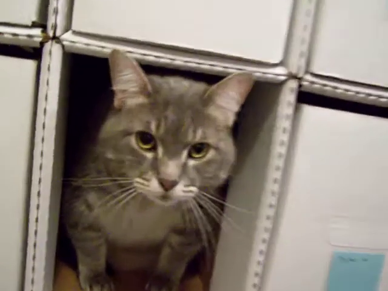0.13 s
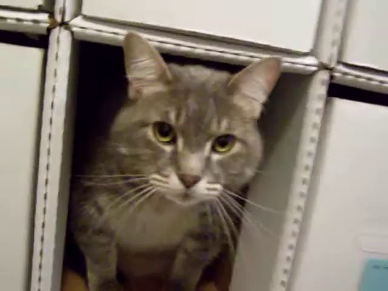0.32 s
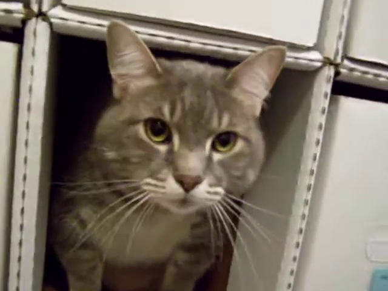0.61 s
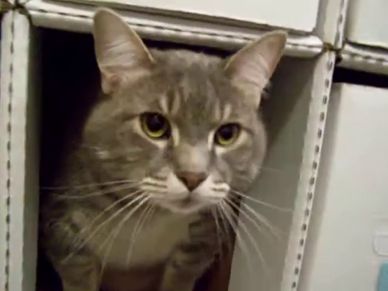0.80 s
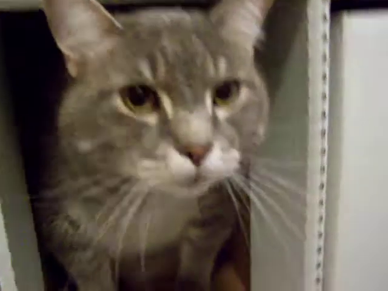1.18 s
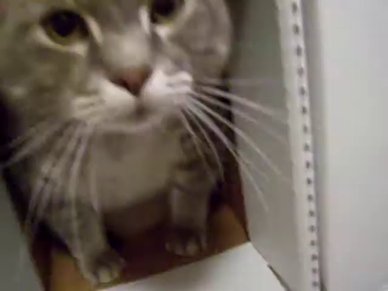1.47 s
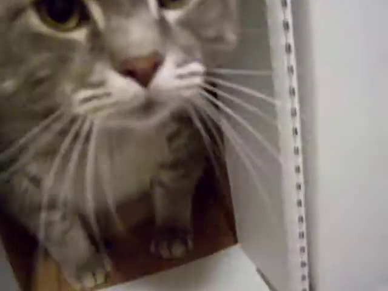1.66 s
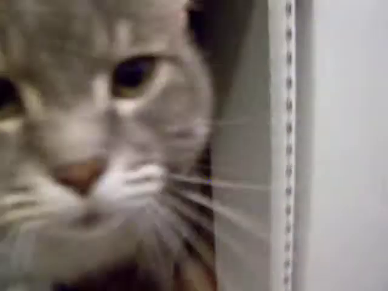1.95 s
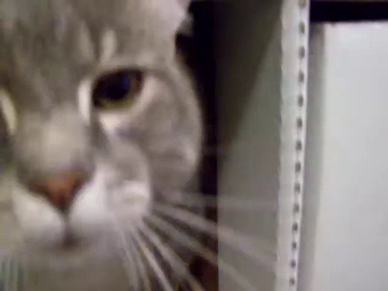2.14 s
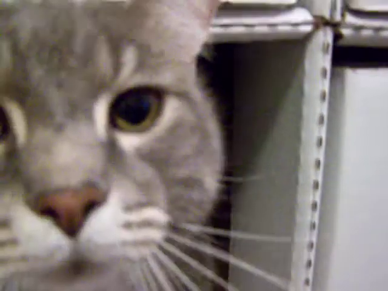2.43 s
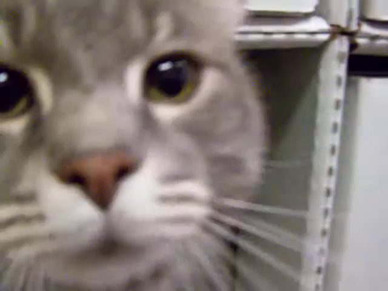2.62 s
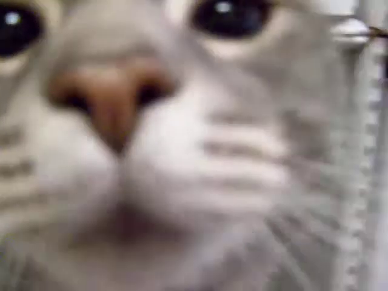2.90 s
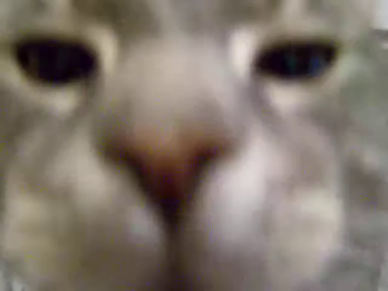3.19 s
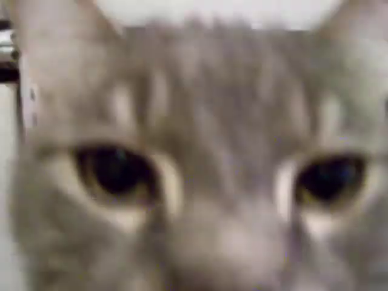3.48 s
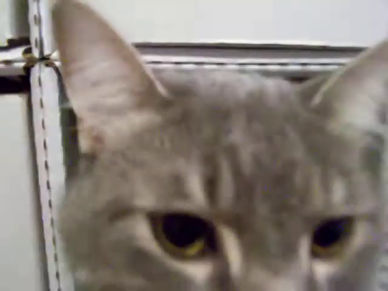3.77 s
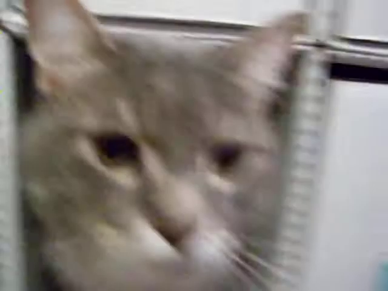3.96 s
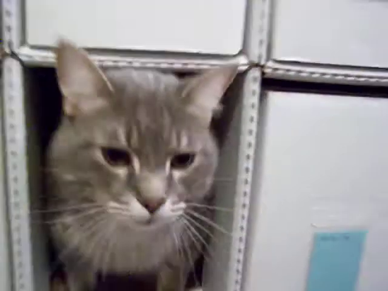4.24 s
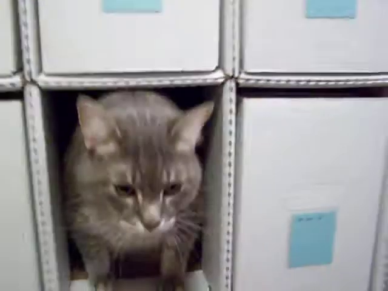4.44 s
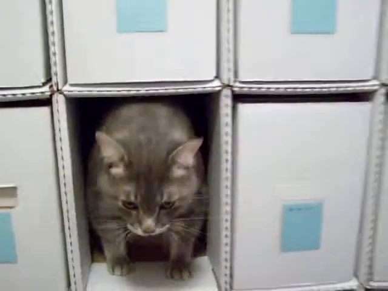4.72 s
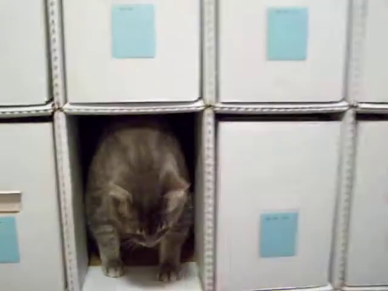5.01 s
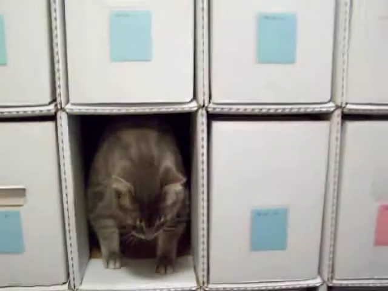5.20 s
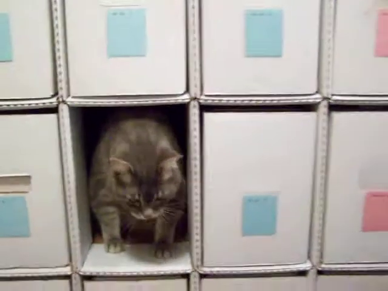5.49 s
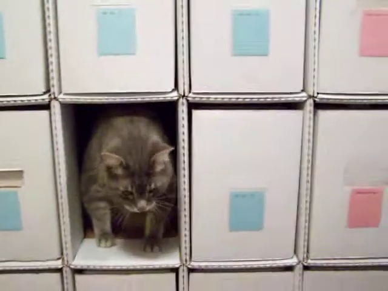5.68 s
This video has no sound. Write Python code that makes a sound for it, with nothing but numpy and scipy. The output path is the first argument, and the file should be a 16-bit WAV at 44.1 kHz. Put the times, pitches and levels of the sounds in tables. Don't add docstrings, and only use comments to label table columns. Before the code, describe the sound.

In a small furnished room, a cat moves in a cardboard compartment. Light scuffs and rustles lead to a rough scrape, then a heavy hollow knock just before two seconds. After a quieter stretch, sharp scraping returns around four seconds, and another heavy knock and a harder short one close the scene. The close hand-held camera adds ticks, dull thumps, hiss and faint hum.

```python
import sys
import numpy as np
from scipy import signal
from scipy.fft import rfft, irfft
from scipy.io import wavfile
from scipy.ndimage import uniform_filter1d

SR = 44100
rng = np.random.default_rng(int(sys.argv[2]) if len(sys.argv) > 2 else 0)


def how_loud(loudness_db):
    steps = np.asarray(loudness_db, float) / 20
    return 10 ** steps


def unload_audio(sound):
    columns = np.transpose(np.atleast_2d(sound))
    steps = np.round(np.clip(columns, -1, 1) * 32767)
    wavfile.write(sys.argv[1], SR, steps.astype(np.int16))


N = 258822
TURN_S = 3.5
# f/Hz, width/Hz, level/dB
BODY_MODES = [
    [(169, 71, -6), (300, 120, -9.5), (457, 170, -2), (607, 41, -1.5), (1027, 68, -3)],
    [(200, 350, -2), (608, 91, 4.5), (778, 23, 1.5), (1068, 260, -4)],
]


def unit(x):
    return x / np.sqrt(np.mean(x ** 2))


def peak(x):
    return x / np.abs(x).max()


def colour(x, points):
    hz, db = np.transpose(points)
    f = np.maximum(np.fft.rfftfreq(len(x), 1 / SR), 1)
    gain_db = np.interp(np.log(f), np.log(hz), db)
    return irfft(rfft(x) * how_loud(gain_db), len(x))


def band(x, hz, width_hz):
    return signal.lfilter(*signal.iirpeak(hz, hz / width_hz, fs=SR), x)


def band_twice(x, hz, width_hz):
    return band(band(x, hz, width_hz), hz, width_hz)


def resonate(x, modes, damping_hz):
    return unit(sum(how_loud(db) * band(x, hz, damping_hz + width_hz) for hz, width_hz, db in modes))


def decay(t, t60_s):
    return 1000. ** (-t / t60_s)


def ring(t, hz, t60_s):
    return np.sin(2 * np.pi * hz * t) * decay(t, t60_s)


def grit(count, spread_db):
    grain = 24
    sizes = how_loud(spread_db * np.minimum(rng.exponential(size=count // grain + 1), 3.5))
    return unit(np.repeat(sizes, grain)[:count] * rng.standard_normal(count))


def walk(rate_hz):
    hold = int(SR / rate_hz)
    steps = np.repeat(rng.standard_normal(N // hold + 1), hold)
    return 1.98 * uniform_filter1d(uniform_filter1d(steps, hold), hold)[:N]


def add(out, s, sound, db):
    i = int(s * SR)
    piece = sound[:N - i]
    out[i:i + len(piece)] += piece * how_loud(db)


def knocks():
    # t/s, peak/dB, crack re peak/dB, crack f/Hz, contact/ms
    hits = [
        (1.8234, -5.5, -33.5, 2600, 1.34),
        (5.1151, -6.5, -35, 2300, 1.17),
        (5.5818, -13, -18, 3410, 0.25),
    ]
    # f/Hz, level/dB, t60/s
    panels = [
        [(174, -9.5, 0.088), (282, 3, 0.037), (381, 3.5, 0.097), (592, 3, 0.1), (730, -20, 0.24),
         (896, 0, 0.062), (1050, -2, 0.2), (1220, -32, 0.23)],
        [(151, -15.5, 0.18), (400, 0.5, 0.067), (506.7, 1, 0.22), (601, 3.5, 0.15), (676, -7.5, 0.085),
         (861, 1.5, 0.075), (1000, 4.5, 0.043), (1140, -12.5, 0.057)],
        [(261.4, -4.5, 0.1), (426, -8.5, 0.065), (506, -2, 0.28), (560, -4, 0.1), (661, -1, 0.1),
         (733, 1, 0.11), (770, -4.5, 0.12), (920, 0.5, 0.048)],
    ]
    # t/s, peak/dB, f/Hz, t60/s
    taps = [(0.324, -23.5, 915, 0.025), (4.105, -24, 701, 0.25), (1.249, -30.5, 592, 0.22),
            (1.499, -35, 714, 0.024), (1.519, -27.5, 765, 0.13), (1.917, -30.5, 776, 0.06),
            (1.948, -35.5, 830, 0.053), (2.935, -40.5, 950, 0.07), (4.154, -17.5, 905, 0.035),
            (4.912, -25, 1635, 0.036), (5.134, -8.5, 659, 0.052), (5.371, -31, 1140, 0.047),
            (2.8, -41, 2440, 0.06), (2.687, -40, 1000, 0.04), (2.927, -32, 5270, 0.023),
            (5.587, -22, 3550, 0.056)]
    rattle_db = -11
    out, t = np.zeros(N), np.arange(SR // 2) / SR
    for (s, db, crack_db, crack_hz, contact_ms), modes in zip(hits, panels):
        rattle = grit(len(t), 2.5)
        rebounds = 0.025 * rattle * decay(t, 0.091)
        rebounds[0] = 1
        push = np.convolve(rebounds, np.hanning(max(int(contact_ms * SR / 1000), 4)))
        panel = np.zeros(len(t))
        for k, (hz, mode_db, t60_s) in enumerate(modes):
            panel += (-1) ** k * how_loud(mode_db) * ring(t, hz, min(t60_s, .18))
        add(out, s, peak(signal.fftconvolve(panel, push)), db)
        fading = np.minimum(t / 0.00033, 1) * decay(t, 0.17)
        add(out, s, fading * unit(band(rattle, 530, 830)), db + rattle_db)
        add(out, s, fading * unit(band(rattle, crack_hz, 2900)), db + crack_db)
    for s, db, hz, t60_s in taps:
        add(out, s, ring(t, hz, t60_s) + 0.44 * ring(t, 0.84 * hz, t60_s), db - 4.5)
    return out


def scuffs():
    # t/s, peak/dB, centre f/Hz, body re peak/dB, t60/s
    short = [(0.3232, -21.5, 2960, -17, 0.14), (0.5293, -46, 3430, -18, 0.12),
             (0.9293, -13, 1950, -10.5, 0.11), (1.098, -31, 3590, 0, 0.068),
             (1.1284, -31.5, 3560, -3.5, 0.057), (1.1722, -34.5, 3600, 0, 0.23),
             (1.3694, -39.5, 4250, 11.5, 0.059), (1.4262, -39.5, 1610, 11.5, 0.13),
             (1.5199, -28.5, 2400, 10.5, 0.06), (1.6327, -34, 3400, -24, 0.086),
             (1.714, -30.5, 2720, 5.5, 0.16), (3.8067, -36.5, 4310, -12, 0.085),
             (3.9858, -28, 3460, -11, 0.11), (4.266, -24.5, 2310, -13, 0.044),
             (4.3055, -27.5, 2580, 3.5, 0.11), (4.35, -45, 2120, -22, 0.13),
             (4.3807, -30.5, 2650, 8.5, 0.18), (4.546, -37, 2950, -3.5, 0.13),
             (5.059, -19, 3600, -18.5, 0.12), (5.2565, -23, 3310, -21, 0.12),
             (5.3708, -28.5, 1730, -4.5, 0.38), (5.5031, -25.5, 2700, 2, 0.14),
             (5.6111, -13.5, 3580, -7, 0.043), (5.6532, -22.5, 3160, -16, 0.31)]
    # t/s, peak/dB, centre f/Hz, rise/ms, hold/ms
    long = [
        (1.199, -9, 2050, 10.8, 13.6),
        (2.071, -12.5, 3020, 7.8, 3.7),
        (4.1027, -10, 3590, 0.74, 44),
        (4.911, -20, 2320, 0.99, 9.8),
        (5.14, -22, 3650, 8.6, 22),
    ]
    # f/Hz, width/Hz, level/dB
    fibres = [(1310, 23, -7), (1884, 39, -0.5), (2390, 210, 1), (2650, 100, 1), (3270, 78, -3),
              (3310, 56, -1.5), (3660, 500, -2), (4610, 30, -8)]
    scuff_rise_ms, drag_t60_s = 2.8, 0.17
    drag_body_db, drag_body_db_per_octave = -5, -10
    rows = [(*row[:4], scuff_rise_ms, row[4], 0, .7) for row in short]
    for s, db, hz, rise_ms, hold_ms in long:
        body_db = drag_body_db + drag_body_db_per_octave * np.log2(hz / 2000)
        rows.append((s, db, hz, body_db, rise_ms, drag_t60_s, hold_ms, 1.3))

    out, t = np.zeros(N), np.arange(SR // 3) / SR
    for s, db, hz, body_db, rise_ms, t60_s, hold_ms, spread in rows:
        rise_s = max(rise_ms, .2) / 1000
        release = decay(np.maximum(t - rise_s - hold_ms / 1000, 0), t60_s)
        force = np.minimum(t / rise_s, 1) * release
        drag = grit(len(t), 1.7)
        drag = drag * unit(uniform_filter1d(np.abs(drag), size=130)) ** .7
        bright = band_twice(drag, hz, 1400) + spread * band(drag, 3100, 6900)
        ribs = 0.27 * (hold_ms > 0) * resonate(drag, fibres, 40)
        add(out, s, force * unit(unit(bright) + ribs), db - 10.5)
        hollow = resonate(drag, BODY_MODES[int(s > TURN_S)], 30)
        body = unit(unit(band_twice(drag, 750, 1200)) + .8 * hollow)
        add(out, s, force * body, db + body_db - 13.5)
    return out


def slides():
    # peak t/s, rise/s, 20 dB fall/s, rustle/dB, body/dB
    surfaces = [
        [(.2, 0.6, 0.8, -51.5, -52.5), (.335, 0.093, 0.05, -32, -52.5)],
        [(.533, 0.011, 0.17, -52, -42.5), (.645, 0.037, 0.21, -36.5, -45.5), (.785, 0.2, .08, -45, -42.5)],
        [(.98, 0.2, 0.15, -48.5, -39.5), (1.115, 0.014, 0.14, -50.5, -44.5)],
        [(2.02, 0.16, 0.2, -43, -60.5)],
        [(2.2, 0.067, 0.2, -49.5, -60), (2.45, 0.13, 0.26, -50, -68), (2.7, 0.3, -0.16, -48, -58),
         (2.82, 0.091, -0.3, -55, -73)],
        [(3.82, 0.052, 0.05, -49, -58)],
        [(4.040, 0.0017, 0.05, -36.5, -53), (4.097, 0.091, 0, -38, -44)],
        [(4.255, 0.018, 0.25, -48.5, -41), (4.352, .005, 0.13, -44, -43), (4.41, 0.015, 0.31, -45.5, -40),
         (4.49, 0.12, 0.14, -52.5, -37.5), (4.585, 0.052, 0.37, -47.5, -44.5)],
        [(4.82, 0.1, 1.35, -46.5, -58.5)],
        [(5.615, 0.0093, 0.03, -36, -39), (5.654, 0.015, 0.07, -34, -68), (5.8, .15, .5, -63.5, -59)],
    ]
    # f/Hz, width/Hz, level/dB
    rustle_modes = [
        [(2320, 45, -1.5), (2580, 24, 6.5), (2960, 53, 13.5)],
        [(1340, 29, -4.5), (2440, 29, 0), (3220, 74, -11), (3900, 220, -7.5)],
        [(2600, 61, 0.5), (3590, 28, 4.5)],
        [(2890, 84, -7), (3630, 470, 3)],
        [(1020, 170, 5.5), (2170, 34, -0.5), (3900, 640, -1.5)],
        [(980, 100, 2), (3330, 26, -2.5), (4310, 40, -3)],
        [(2800, 120, -13), (3690, 53, 0)],
        [(1700, 62, 10), (2300, 56, -4), (2580, 28, 3.5), (3080, 74, 1.5), (3630, 49, -2)],
        [(2100, 100, -6), (4430, 790, 6)],
        [(2420, 100, 8), (3200, 65, -9), (4740, 56, 0), (5830, 130, 11)],
    ]
    air_levels_db = [-8.5, -27, -14.5, -2, -12, -3, -20, -21, -3.5, 2.5]
    body_swing = 0.82
    t = np.arange(N) / SR
    rub = grit(N, 2.4) * how_loud(.6 * walk(40))
    broad = unit(band(rub, 2500, 3500))
    bodies = [resonate(rub, modes, 15) * how_loud(.8 * walk(30)) for modes in BODY_MODES]
    air = unit(band_twice(rub, 5900, 3300)) * how_loud(3)
    out = np.zeros(N)
    for strokes, modes, air_db in zip(surfaces, rustle_modes, air_levels_db):
        rustle = unit(1.26 * broad + resonate(rub, modes, 100)) + how_loud(air_db) * air
        for s, rise_s, fall_s, db, body_db in strokes:
            swell_db = 40 * np.log10(np.clip(1 + (t - s) / max(rise_s, .003), 1e-4, None))
            fall_db = -20 * np.maximum(t - s, 0) / max(fall_s, .003)
            slack_db = np.minimum(swell_db, fall_db)
            out += how_loud(db + slack_db) * rustle
            out += how_loud(body_db + body_swing * slack_db) * bodies[int(s > TURN_S)]
    return out


def handling():
    # t/s, peak/dB, ring f/Hz, body re peak/dB, t60/s
    ticks = [(0.3235, -23.5, 2960, -5, 0.012), (0.4109, -20, 1595, 1.5, 0.026),
             (0.4128, -19, 2750, -4, 0.019), (1.502, -33.5, 1520, -3, 0.042),
             (1.9725, -14.5, 4010, -11.5, 0.016), (1.983, -28, 3630, -3.5, 0.044),
             (2.927, -28.5, 4100, -20, 0.01), (3.891, -37, 1340, -17, 0.021),
             (4.1548, -18.5, 3870, 12, 0.03), (4.349, -37, 2310, 9, 0.052), (5.4484, -44, 1200, 12, 0.015),
             (5.5568, -16, 2700, -20, 0.021), (5.6507, -22.5, 4510, -21, 0.039)]
    # t/s, peak/dB, f/Hz, t60/s
    thumps = [(.409, -31, 120, 0.017), (.527, -34.5, 337, 0.045), (0.777, -34, 82, 0.09),
              (0.934, -31, 333, 0.07), (1.8256, -28.5, 129, 0.098), (1.974, -41, 369, 0.14),
              (3.863, -35, 200, 0.061), (3.89, -43.5, 282, .07), (4.158, -49.5, 90, 0.066),
              (5.117, -35, 110, 0.096), (5.447, -28, 227, 0.067), (5.471, -33, 144, 0.14)]
    out, t = np.zeros(N), np.arange(SR // 4) / SR
    for s, db, hz, body_db, t60_s in ticks:
        snap = rng.standard_normal(len(t)) * decay(t, t60_s)
        snap[0] = 3.97
        click = peak(band(snap, hz, 600) + 0.22 * band(snap, 4500, 4000))
        add(out, s, peak(click + 0.47 * ring(t, hz, t60_s)), db)
        add(out, s, peak(band(snap, 800, 1500)), db + body_db)
    for s, db, hz, t60_s in thumps:
        modes = ring(t, hz, t60_s) + 0.23 * ring(t, 1.5 * hz, 2.1 * t60_s)
        add(out, s, modes * np.minimum(t / 0.0013, 1), db + 3.0)
    return out


def floor():
    # f/Hz, density/dB per Hz
    hiss_points = [(15, -36), (25, -12.5), (70, -14.5), (160, -9), (300, -13.5), (500, -19), (1000, -18.5),
                   (1700, -19.5), (3000, -22.5), (4300, -19.5), (4900, -28), (7300, -32), (8400, -44),
                   (9200, -77.5)]
    # f/Hz, level/dB
    hum_lines = [(56, -64.5), (151, -66), (198, -68), (293, -66.5), (316, -51.5), (340, -59), (737, -64.5),
                 (1320, -65.5), (1400, -67), (1580, -67), (2143, -64.5)]
    # t/s, level/dB
    hum_swell = [(0, -4), (.5, -6.5), (1.2, -7.5), (1.6, -3.5), (3.9, -2), (4.2, -4.5), (4.8, -6),
                 (5.87, -9.5)]
    # f/Hz, level/dB
    far_line = (438, -69.5)
    hiss_db = -46.5
    t = np.arange(N) / SR
    out = unit(colour(rng.standard_normal(N), hiss_points)) * how_loud(hiss_db - 3.0 + 0.38 * walk(0.54))
    swell_db = np.interp(t, *np.transpose(hum_swell))
    levels = [(hz, db + swell_db) for hz, db in hum_lines]
    levels.append((far_line[0], far_line[1] - swell_db))
    for hz, db in levels:
        level = np.sqrt(2) * how_loud(db + 0.47 * walk(4.98))
        out += level * np.sin(2 * np.pi * hz * t + 0.69 * walk(4.13))
    return out


def room(box):
    t60_s, level_db, top_hz = 0.26, -13.5, 5230
    t = np.arange(SR // 2) / SR
    echo = band(rng.standard_normal(len(t)), top_hz / 3, top_hz)
    echo = echo * decay(t, t60_s) * np.minimum(t / 0.0015, 1)
    return how_loud(level_db) * signal.fftconvolve(box, echo / np.sqrt(np.sum(echo ** 2)))[:N]


def scene():
    # f/Hz, level/dB
    microphone = [(30, -9), (150, 1.5), (1500, 0.5), (4000, 2.5), (5000, -4.5), (7000, -15), (8300, -27),
                  (8900, -50.5)]
    box = knocks() + scuffs() + slides()
    return (colour(box + room(box) + handling(), microphone) + floor())[None]


def band_limit(x):
    return signal.sosfilt(signal.butter(12, 8870, fs=SR, output="sos"), x)


def record(dry):
    rounded = np.tanh(1.075 * dry) / 1.12
    low_pass = signal.ellip(8, .2, 60, 8800, fs=SR, output="sos")
    return band_limit(signal.sosfilt(low_pass, rounded))


dry = scene()
out = record(dry)
unload_audio(out)
```